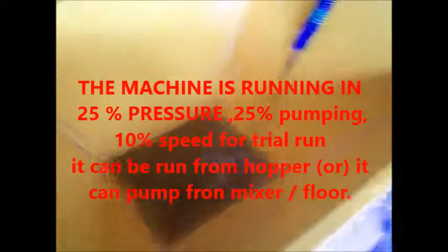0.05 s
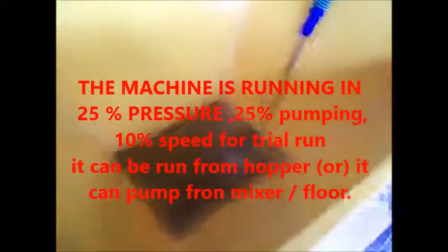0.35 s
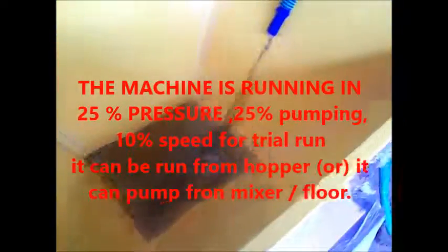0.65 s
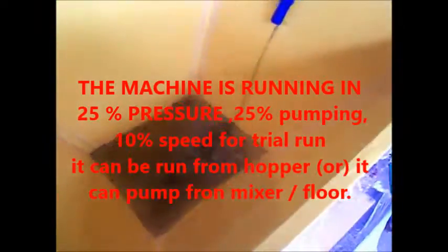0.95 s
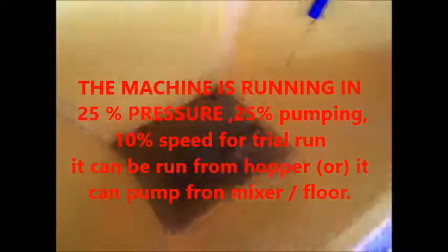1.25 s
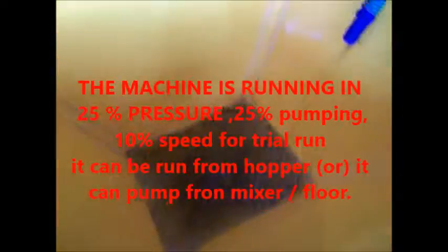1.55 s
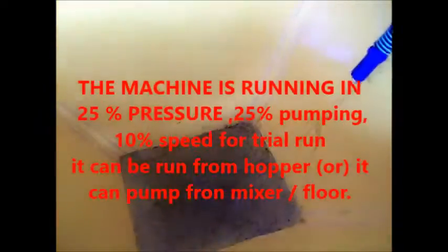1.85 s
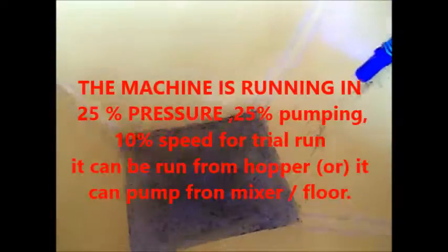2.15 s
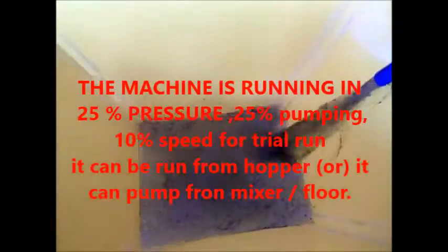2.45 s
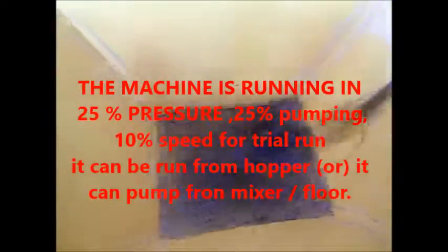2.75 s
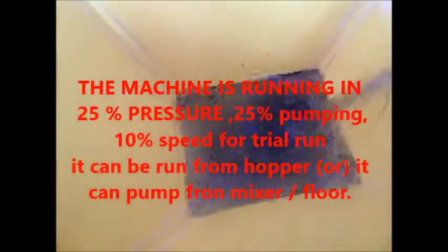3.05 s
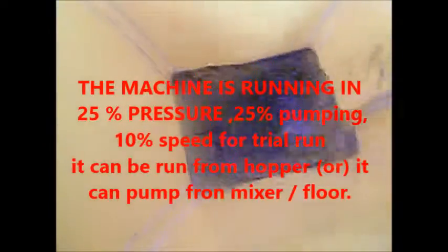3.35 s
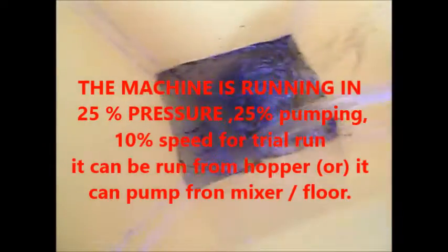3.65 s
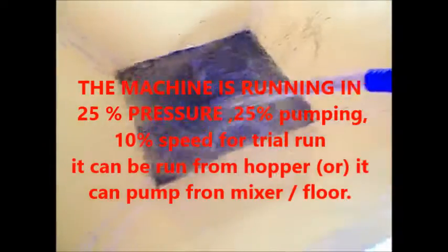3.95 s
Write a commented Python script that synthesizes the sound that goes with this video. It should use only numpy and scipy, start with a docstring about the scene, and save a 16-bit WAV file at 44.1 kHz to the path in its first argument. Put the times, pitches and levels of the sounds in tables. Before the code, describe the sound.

Wet mortar dribbles from a hose into a steel hopper over a faint motor hum. A juddering bang sets the metal ringing, then the mix gushes out, splashing, spitting air and drumming on the steel close by.

```python
"""At a steel hopper, a hose spits wet mortar while the pump motor hums.
A weak dribble dies away. Something bangs and judders against the hopper, which rings.
Then air plops out of the nozzle and the mix gushes: it splashes, air pockets crackle,
lumps slap and glug, and the stream drums on the sheet steel."""
import sys
import numpy as np
from scipy import signal
from scipy.fft import rfft, irfft
from scipy.io import wavfile
from scipy.ndimage import uniform_filter1d

SR = 44100
rng = np.random.default_rng(int(sys.argv[2]) if len(sys.argv) > 2 else 0)


def digitize_waveform(pressure):
    """Quantize a signal to 16-bit integers and store it at the path in sys.argv[1].

    Rows of a 2-D input are taken as channels; values are limited to [-1, 1].
    """
    field = np.atleast_2d(pressure).T
    bounded = np.clip(field, -1, 1)
    quanta = np.round(bounded * 32767).astype(np.int16)
    wavfile.write(sys.argv[1], SR, quanta)


N = 176400
T = np.arange(N) / SR
BANG_S = 1.711

# A fade time (t60) is how long a sound takes to drop by 60 dB. Levels in a table are relative.
# The motor's strong overtones: (multiple of its lowest note, level [dB])
MOTOR_HUM = [(1, -62.5), (3, -66.5), (4, -63.5), (8, -67), (9, -65.5), (10, -71), (11, -62.5), (12, -63.5),
             (14, -70), (17, -62), (18, -61), (20, -68), (28, -70.5), (34, -73.5)]
# Its weak overtones: (frequency [Hz], level [dB])
MOTOR_BUZZ = [(100, -76.5), (800, -78.5), (1150, -82), (1900, -79.5), (2400, -77.5), (2900, -81.5),
              (4000, -84.5), (4700, -79.5), (5800, -88)]
# Its whine: (time [s], frequency [Hz], level [dB])
MOTOR_WHINE = [(0, 2380, -65.5), (.6, 2390, -65), (1.0, 2350, -64), (1.35, 2300, -61.5), (1.6, 2235, -66.5),
               (2.1, 2330, -71.5)]
# Tone of the background hiss: (frequency [Hz], level [dB])
HISS_TONE = [(20, -1.5), (65, 3), (100, -6.5), (160, -4.5), (280, -7), (600, -5), (900, -7), (1200, -11.5),
             (2000, -15.5), (2400, -10), (3000, -15), (4000, -18), (5000, -14.5), (8000, -22.5)]
# Splashing of the dribble and of the gush: (time [s], level [dB])
DRIBBLE_SPLASH = [(0, -40.5), (.07, -49.5), (.19, -55.5), (.27, -44), (.34, -48.5), (.37, -45),
                  (.53, -48.5), (.57, -41.5), (.71, -49), (.82, -58.5)]
GUSH_SPLASH = [(2.22, -52.5), (2.41, -44), (2.5, -35.5), (2.6, -37.5), (2.68, -33), (2.8, -40.5),
               (2.88, -37.5), (3.02, -36.5), (3.12, -30.5), (3.21, -31), (3.25, -37), (3.29, -37),
               (3.46, -31), (3.6, -34), (3.74, -30), (3.87, -33.5), (4, -33.5)]
# Crackling air in each: (time [s], level [dB])
DRIBBLE_CRACKLE = [(0, -49.5), (.08, -75), (.25, -58.5), (.32, -66.5), (.44, -62), (.52, -69.5), (.58, -62),
                   (.65, -76), (.86, -76)]
GUSH_CRACKLE = [(2.22, -58), (2.27, -54), (2.35, -58), (2.5, -48), (2.63, -59), (2.68, -48), (2.79, -57.5),
                (2.94, -48), (3.05, -49.5), (3.11, -41.5), (3.21, -44), (3.25, -52), (3.29, -45),
                (3.62, -44.5), (3.73, -42.5), (4, -43.5)]
# Tone of the splashes and of the crackle: (frequency [Hz], level [dB])
SPLASH_TONE = [(40, -24), (105, -12), (135, -2), (200, -2), (255, 1), (340, -6), (430, 1), (600, -7),
               (800, -1), (1100, -7), (1400, -14.5), (1700, -17.5), (2100, -23.5), (3000, -30.5),
               (6000, -39.5)]
CRACKLE_TONE = [(900, -21.5), (1600, -6), (2100, -12.5), (2850, -1.5), (3400, -4), (3900, -8.5),
                (4900, -4.5), (5600, -6.5), (8000, -26.5)]
# Notes the stream drums out of the steel: (frequency [Hz], level [dB], fade time [s])
DRUM_NOTES = [(68.4, -20, 0.62), (86.1, -11, 0.87), (134.6, -14.5, 0.91), (173.3, -16.5, .3),
              (264.2, -14, 0.21), (425.8, -21, 0.36), (681, -20.5, 0.53), (801, -18, 0.88)]
# How hard it drums: (time [s], level [dB])
DRUM_STRENGTH = [(2.15, -43), (2.55, -36), (2.8, -37.5), (2.95, -40.5), (3.28, -31), (3.55, -35),
                 (4, -30.5)]
# Bursting air pockets: (time [s], level [dB], frequency [Hz], fade time [s], slide [octaves/s])
AIR_PLOPS = [(0.101, -42.5, 1120, 0.095, -4.5), (.354, -36, 955, 0.22, 0), (2.239, -34, 734, 0.14, -0.5),
             (2.24, -35.5, 250, 0.056, -12), (2.276, -30, 705, .13, 2), (2.316, -29.5, 967, 0.032, 5.5),
             (2.458, -33, 1120, 0.028, 1), (2.639, -32.5, 783, 0.22, 2.5), (2.664, -35, 945, 0.025, -8),
             (2.795, -32.5, 525, 0.049, -5), (3.274, -25.5, 318, 0.086, -7.5),
             (3.289, -26.5, 1173, 0.14, -3.5), (3.366, -23.5, 224, 0.056, 1),
             (3.373, -29, 1102, 0.11, -3.5), (3.417, -25.5, 960, 0.12, -1), (3.499, -25.5, 1120, 0.014, 0),
             (3.854, -21.5, 1125, 0.015, 3.5), (3.943, -26.5, 1090, 0.14, -2.5)]
# Grit hitting the steel: (time [s], level [dB])
GRIT_TICKS = [(.124, -19.5), (.351, -13), (.361, -32), (2.383, -13.5), (2.455, -27), (2.553, -28),
              (2.64, -17), (2.657, -23), (2.743, -27), (3.074, -12), (3.592, -20), (3.791, -22),
              (3.968, -18)]
# Tone of a tick: (frequency [Hz], level [dB])
TICK_TONE = [(200, -14.5), (1000, -1.5), (2100, -1.5), (3000, -1), (4000, 0), (5200, 6), (9000, -4)]
# Sharp spits of air: (time [s], level [dB], frequency [Hz])
AIR_SPITS = [(.205, -44.5, 3150), (.256, -45, 3300), (.285, -46, 3400), (.436, -40.5, 3640),
             (0.485, -39, 3160), (.508, -44, 3500), (.555, -42.5, 3350), (0.576, -41.5, 2880),
             (0.671, -43.5, 1850), (.722, -46.5, 2620), (2.319, -38.5, 2940), (2.546, -31.5, 2950),
             (2.602, -29.5, 3410), (2.668, -28, 1770), (2.739, -40, 3270), (2.979, -31, 2780),
             (3.108, -27.5, 4600), (3.123, -29, 5170), (3.148, -27.5, 2900), (3.281, -27.5, 2840),
             (3.404, -26.5, 2750), (3.516, -21.5, 2890), (3.73, -24.5, 3200), (3.782, -29, 2700),
             (3.821, -25.5, 3370), (3.902, -24.5, 3150), (3.987, -24, 3010)]
# Tone of the clack and of the bump: (frequency [Hz], level [dB])
CLACK_TONE = [(200, -14), (850, 4), (1300, -22), (2000, -6), (2500, -14), (2950, 4.5), (3400, -8.5),
              (5200, -1), (8000, -23)]
BUMP_TONE = [(30, -21), (75, -1.5), (150, -1.5), (240, -16.5), (450, -13), (850, -19.5), (1150, -30.5),
             (3000, -31), (8000, -60)]
# Knocks of the judder: (time [s], level [dB])
KNOCKS = [(1.705, -7), (1.714, -1.5), (1.724, 4.5), (1.74, -4), (1.775, -2), (1.783, -7.5), (1.796, -3.5),
          (1.806, -9), (1.84, -9.5), (1.875, -7.5)]
# Tone of the steel's many weak notes: (frequency [Hz], level [dB])
STEEL_TONE = [(60, -15), (200, -8.5), (470, 2.5), (620, -4.5), (730, -7.5), (880, 2), (1220, -1),
              (1410, -10.5), (1600, 2.5), (1800, -11), (2100, -17.5), (2800, -13), (3600, -25.5),
              (4150, -14), (5500, -20.5), (8000, -42)]
# How long they last: (frequency [Hz], fade time [s])
STEEL_FADE = [(100, 1.6), (500, 1.13), (1200, 0.6), (1800, 0.51), (3000, 0.64), (5500, 0.46)]
# Notes that flare under the two hardest blows: (time [s], frequency [Hz], level [dB])
FLARE_NOTES = [(1.718, 415, -19), (1.718, 490, -22), (1.718, 562, -22), (1.711, 1205, -23),
               (1.709, 1572, -19), (1.709, 1635, -19.5), (1.715, 1780, -29), (1.768, 530, -23),
               (1.768, 690, -25), (1.768, 1075, -23)]
# The hopper's ringing notes: (frequency [Hz], level [dB], fade time [s])
HOPPER_NOTES = [(68.8, -34.5, 2.2), (84.5, -28.5, 2.2), (100.3, -33, 1.5), (136.2, -37, 1.6),
                (181.2, -36, 2.2), (257, -42, 1.8), (298, -37.5, 0.99), (349, -43, 1.5),
                (433.4, -29.5, 1.28), (503, -32.5, 1.2), (556.6, -32.5, 0.87), (780, -39, 0.59),
                (900, -29, 0.82), (985, -33, .45), (1097, -34, 0.89), (1120, -39, 1.4), (1207, -32, 0.7),
                (1278, -31, 0.5), (1604, -35, 1), (1638, -38.5, 0.85)]
# Lumps slapping the steel: (time [s], level [dB])
LUMP_SLAPS = [(2.482, -27.5), (2.667, -21.5), (3.069, -21), (3.188, -20), (3.282, -26), (3.378, -21),
              (3.456, -21.5), (3.523, -23), (3.655, -13), (3.661, -22.5), (3.783, -22), (3.821, -24)]
# Heavy lumps glugging: (time [s], level [dB], starting frequency [Hz])
LUMP_GLUGS = [(2.485, -33, 260.5), (3.278, -28, 292.5), (3.335, -29, 210.6), (3.425, -32, 191.5),
              (3.725, -29.5, 319)]


def from_db(db):
    """Turn decibels into a volume factor."""
    return np.exp(np.asarray(db) * np.log(10) / 20)


def rms_one(x):
    """Scale a sound to an average strength (rms) of 1."""
    return x / np.sqrt(np.mean(x ** 2) + 1e-20)


def at_hz(points, hz):
    """Look up a frequency in a table, spacing octaves evenly."""
    freqs, values = np.transpose(points)
    return np.interp(np.log(np.maximum(hz, 1)), np.log(freqs), values)


def level(rows):
    """Volume that follows a table and fades away beyond its ends."""
    s, db = np.transpose(rows)
    fade_db_per_s = 104
    return from_db(np.interp(T, s, db) - fade_db_per_s * np.abs(T - np.clip(T, s[0], s[-1])))


def colour(x, tone, size=8192):
    """Give a sound a tone, with a filter that never rings early (minimum phase)."""
    cepstrum = irfft(np.log(from_db(at_hz(tone, np.arange(size // 2 + 1) * SR / size))))
    cepstrum[1:size // 2] *= 2
    cepstrum[size // 2 + 1:] = 0
    return signal.fftconvolve(x, irfft(np.exp(rfft(cepstrum))))[:len(x)]


def noise(tone, length=N):
    """Steady noise with the given tone, strength 1."""
    return rms_one(colour(rng.standard_normal(length), tone))


def drift(per_s):
    """A random wander of strength 1."""
    points = rng.standard_normal(2000)
    return rms_one(np.interp(T * per_s, np.arange(len(points)), points))


def ring(x, hz, t60):
    """Let a sound set one fading note ringing."""
    keep, turn = decay(1 / SR, t60), 2 * np.pi * hz / SR
    return signal.lfilter([0, np.sin(turn)], [1, -2 * keep * np.cos(turn), keep ** 2], x + 1e-18)


def decay(t, t60):
    """A smooth fade that is 60 dB down after t60 seconds."""
    return np.exp(-np.log(1000) * t / t60)


def swell(t, rise_s, t60):
    """A soft start, then a fade."""
    return (1 - np.exp(-(t / rise_s) ** 2)) * decay(t, t60)


def sine(hz):
    """A pure note that follows a changing pitch."""
    return np.sin(2 * np.pi * np.cumsum(hz) / SR)


def add(out, s, sound):
    """Mix a sound in at s seconds."""
    i = int(s * SR)
    out[i:i + len(sound)] += sound[:N - i]


def burst(tone, t60, crack_db=0):
    """A crack and a short puff of noise, peak 1."""
    t = T[:SR // 8]
    x = colour(rng.standard_normal(len(t)) * decay(t, t60) + from_db(crack_db) * (t == 0), tone)
    return x / np.abs(x).max()


def short_hiss(hz, t60, rise_s=.0037):
    """A narrow hiss that dies quickly, peak 1."""
    t = T[:SR // 5]
    puff = rng.standard_normal(len(t)) * decay(t, t60) * np.minimum(t / rise_s, 1)
    x = ring(ring(puff, hz, t60=.0072), hz, t60=.0031)
    return x / np.abs(x).max()


def pops(tone, per_s, cycles, spread_db, range_hz, pitches=28):
    """Many tiny random collapses, each ringing for some cycles; strength 1."""
    sizes = from_db(spread_db * np.minimum(rng.exponential(1, N), 4.5)) * rng.choice([-1, 1], N)
    clicks = sizes * (rng.random(N) < per_s / SR)
    chosen = rng.integers(0, pitches, N)
    out = np.zeros(N)
    for k, hz in enumerate(np.geomspace(*range_hz, pitches)):
        ringing = ring(clicks * (chosen == k), hz, cycles / hz)
        out += np.sqrt(hz) * rms_one(np.diff(ringing, prepend=0))
    return rms_one(colour(out, tone))


def motor(hz=49.3, waver=.00047, whine_width_hz=66):
    """The pump motor hums over a soft hiss; a whine in its buzz sinks, then lifts as it weakens."""
    phase = 2 * np.pi * np.cumsum(hz * (1 + waver * drift(7.1))) / SR
    strong = {round(k): db for k, db in MOTOR_HUM}
    cycle = np.linspace(0, 2 * np.pi, 8192)
    wave = whine = 0
    for k in range(1, 120):
        db = strong.get(k, at_hz(MOTOR_BUZZ, k * hz))
        wave += from_db(db) * np.sin(k * cycle + 2 * np.pi * rng.random())
    s, whine_hz, whine_db = np.transpose(MOTOR_WHINE)
    for k in range(43, 54):
        distance = (k * hz - np.interp(T, s, whine_hz)) / whine_width_hz
        whine += np.sin(k * phase + 2 * np.pi * rng.random()) / (1 + distance ** 2)
    hum = np.interp(phase % (2 * np.pi), cycle, wave)
    whine *= from_db(np.interp(T, s, whine_db))
    return np.sqrt(2) * (hum + whine) + from_db(-52.5) * noise(HISS_TONE)


def stream():
    """Splashes, gurgling bubbles and crackling air all surge with the uneven flow."""
    surge = drift(45)
    splash = pops(SPLASH_TONE, per_s=3200, cycles=9.2, spread_db=2, range_hz=(88, 4260))
    gurgle = pops(SPLASH_TONE, per_s=400, cycles=32, spread_db=.74, range_hz=(171.4, 1690), pitches=18)
    crackle = pops(CRACKLE_TONE, per_s=4500, cycles=21, spread_db=4.5, range_hz=(1185, 6750))
    spray = from_db(-6) * noise(CRACKLE_TONE)
    sputter_db = 1.5 * surge + 2.43 * drift(130)
    wet_volume = (level(DRIBBLE_SPLASH) + level(GUSH_SPLASH)) * from_db(-2.5 + .6 * surge)
    air_volume = (level(DRIBBLE_CRACKLE) + level(GUSH_CRACKLE)) * from_db(5.5 + sputter_db)
    return (splash + from_db(-5) * gurgle) * wet_volume + rms_one(crackle + spray) * air_volume


def drumming(thud_hz=173):
    """The dribble lands with a hollow thud; the full stream keeps the steel booming."""
    thud = rms_one(ring(ring(rng.standard_normal(N), thud_hz, t60=.11), thud_hz, t60=.02))
    boom = sum(from_db(db) * rms_one(ring(rng.standard_normal(N), hz, t60))
               for hz, db, t60 in DRUM_NOTES)
    return level(DRIBBLE_SPLASH) * from_db(-6) * thud + level(DRUM_STRENGTH) * boom


def hopper_echo(x):
    """Sound bounces quickly between the steel walls."""
    t = T[:SR // 2]
    tail = rng.standard_normal(len(t)) * decay(t, t60=.14) * (t > .002)
    return x + from_db(-9) * signal.fftconvolve(x, tail / np.linalg.norm(tail))[:N]


def plops():
    """Air pockets burst, each with a wobbly note and a little splash."""
    out, t = np.zeros(N), T[:SR // 5]
    for s, db, hz, t60, slide in AIR_PLOPS:
        shape = swell(t, rise_s=.0027, t60=t60)
        wobble = .054 * rms_one(uniform_filter1d(rng.standard_normal(len(t)), size=150))
        note = sine(hz * (2 ** (slide * t) + wobble))
        splash = from_db(-12.5) * noise(STEEL_TONE, len(t))
        add(out, s, from_db(db) * shape / shape.max() * (note + splash))
    return out


def ticks():
    """Grit hits with a sharp crack, then scatters."""
    out = np.zeros(N)
    for s, db in GRIT_TICKS:
        add(out, s, from_db(db) * burst(TICK_TONE, t60=.014, crack_db=23.5))
    return out


def spits(drops_per_s=480):
    """Air spits out with a short hiss and a spray of droplets."""
    out, t = np.zeros(N), T[:SR // 5]
    for s, db, hz in AIR_SPITS:
        air = from_db(.5) * short_hiss(hz, t60=.025)
        drops = rng.standard_normal(len(t)) * (rng.random(len(t)) < drops_per_s / SR)
        spray = colour(drops * decay(t, t60=.05), CRACKLE_TONE)
        add(out, s, from_db(db) * (air + spray / (np.abs(spray).max() + 1e-12)))
    return out


def clack_and_bump(clack_s=1.583, bump_s=1.608, rise_s=.028):
    """A light clack and a soft bump come just before the bang."""
    out, t = np.zeros(N), T[:2 * SR]
    add(out, clack_s, from_db(-41.5) * noise(CLACK_TONE, len(t)) * decay(t, t60=.3))
    shape = np.minimum(t / rise_s, 1) * decay(t, t60=.59)
    add(out, bump_s, from_db(-31) * noise(BUMP_TONE, len(t)) * shape)
    return out


def judder():
    """Quick knocks each crack against the steel and stir up its many weak notes."""
    out, hits = np.zeros(N), np.zeros(N)
    for s, db in KNOCKS:
        add(hits, s, from_db([db]))
        add(out, s, from_db(db - 20) * burst(STEEL_TONE, t60=.079))
    steel = from_db(-26) * noise(STEEL_TONE)
    edges_hz = np.geomspace(50, 8000, 10)
    for low, high in zip(edges_hz, edges_hz[1:]):
        band = signal.sosfilt(signal.butter(2, [low, high], "band", fs=SR, output="sos"), steel)
        t60 = at_hz(STEEL_FADE, np.sqrt(low * high))
        energy = signal.lfilter([1], [1, -decay(2 / SR, t60)], hits ** 2)  # builds up, then drains
        out += band * np.sqrt(energy)
    return out


def bang(rise_s=.038, flutter_db=2.5, bend_hz=22.1, screech_s=1.707):
    """With a short screech, the blows set the hopper ringing; the flexing sheet makes its notes waver."""
    out, t = np.zeros(N), T[:2 * SR]
    for hz, db, t60 in HOPPER_NOTES:
        volume = from_db(db + flutter_db * drift(25)[:len(t)])
        shape = np.minimum(t / rise_s, 1) * decay(t, t60)
        add(out, BANG_S, volume * shape * np.sin(2 * np.pi * (hz * t + rng.random())))
    flare = swell(t, rise_s=.016, t60=.19)
    for s, hz, db in FLARE_NOTES:
        add(out, s, from_db(db) * flare * sine(hz + bend_hz * drift(90.4)[:len(t)]))
    add(out, screech_s, from_db(-29.5) * short_hiss(hz=3120, t60=.15))
    return out


def slaps():
    """Wet lumps smack the steel."""
    out = np.zeros(N)
    for s, db in LUMP_SLAPS:
        add(out, s, from_db(db) * burst(SPLASH_TONE, t60=.018))
    return out


def glugs(wobble_octaves=.1, sag_octaves_per_s=4):
    """Each heavy lump traps a pocket of air whose low note wobbles and sags."""
    out, t = np.zeros(N), T[:SR // 3]
    shape = swell(t, rise_s=.013, t60=.26)
    for s, db, hz in LUMP_GLUGS:
        pitch = hz * 2 ** (wobble_octaves * drift(128)[:len(t)] - sag_octaves_per_s * t)
        add(out, s, from_db(db) * shape / shape.max() * sine(pitch))
    return out


def scene(left_delay_s=8.3e-5):
    """Mix everything; it reaches the left side a moment after the right."""
    mortar = hopper_echo(stream() + plops() + spits() + slaps() + ticks() + glugs())
    right = mortar + drumming() + clack_and_bump() + bang() + judder() + motor()
    hz = np.arange(N + 1) * SR / (2 * N)
    left = irfft(rfft(right, 2 * N) * np.exp(-2j * np.pi * hz * left_delay_s))[:N]
    return np.array([left, right])


def record(dry):
    """Cut the treble steeply, letting only a trace leak past."""
    def cut_above(x, hz, order):
        return signal.sosfilt(signal.butter(order, hz, fs=SR, output="sos"), x)
    leak = from_db(-28) * cut_above(dry, hz=7060, order=3)
    return cut_above(cut_above(dry, hz=5750, order=14) + leak, hz=13000, order=12)


dry = scene()
out = record(dry)
digitize_waveform(out)
```